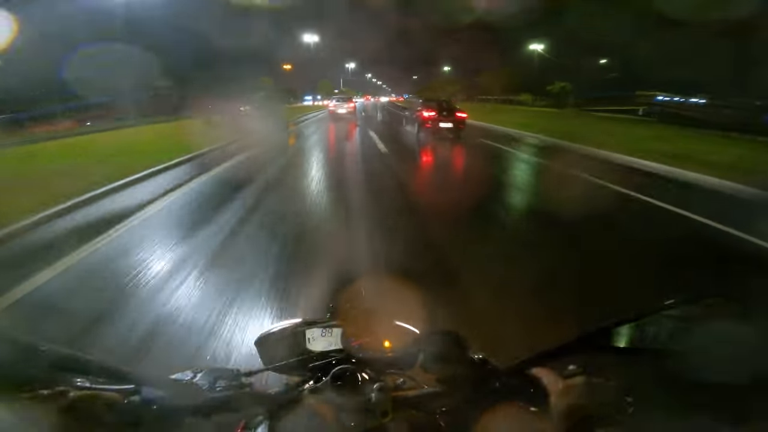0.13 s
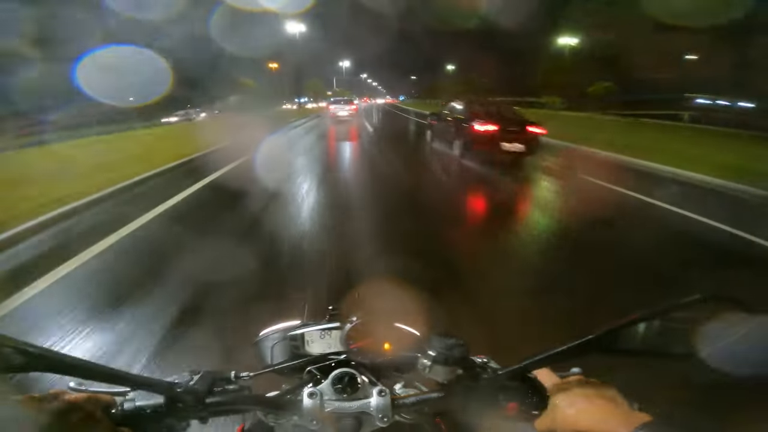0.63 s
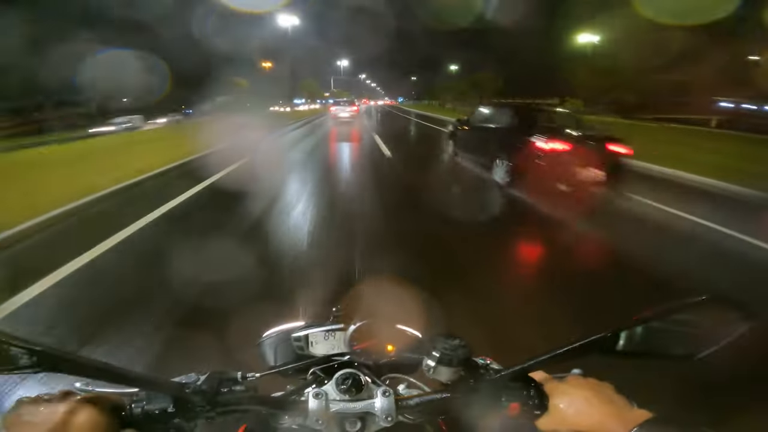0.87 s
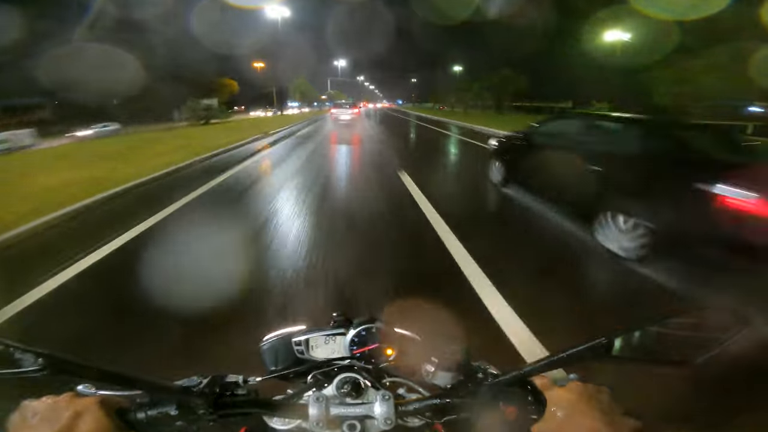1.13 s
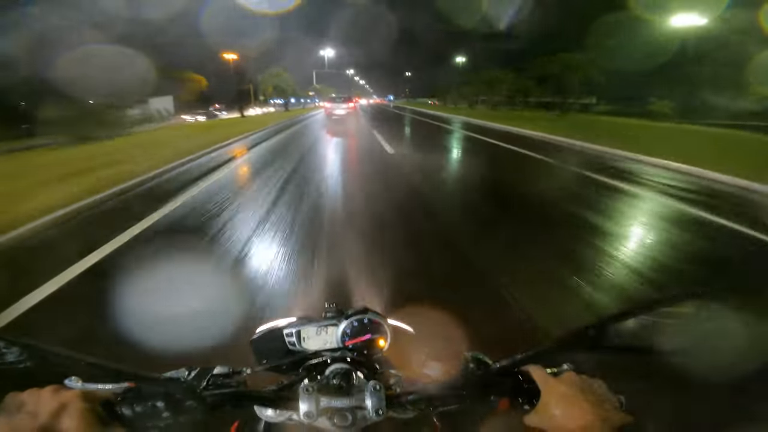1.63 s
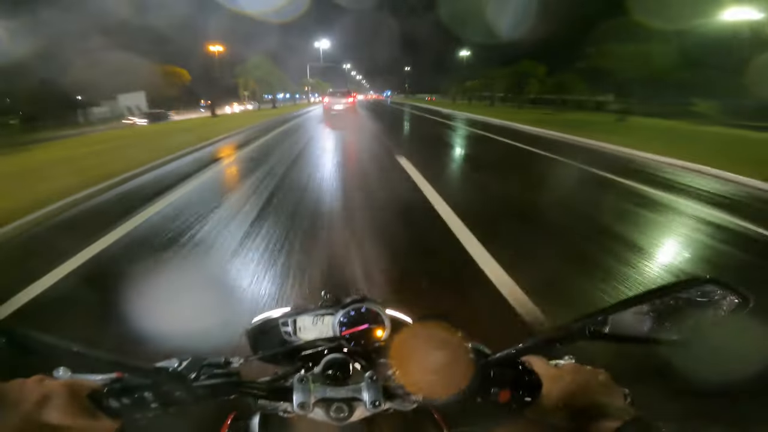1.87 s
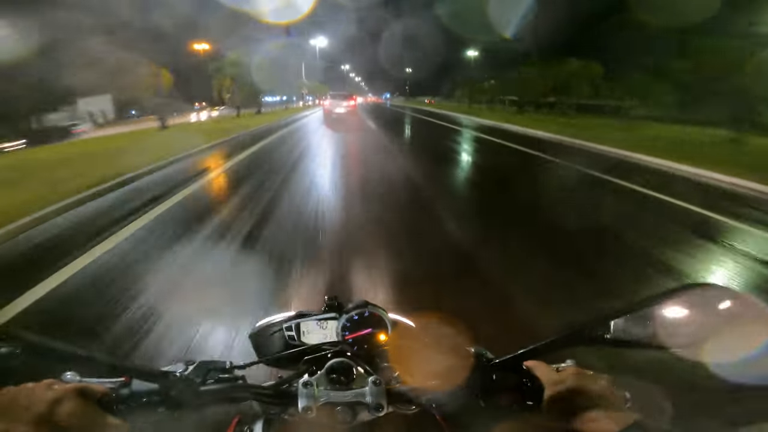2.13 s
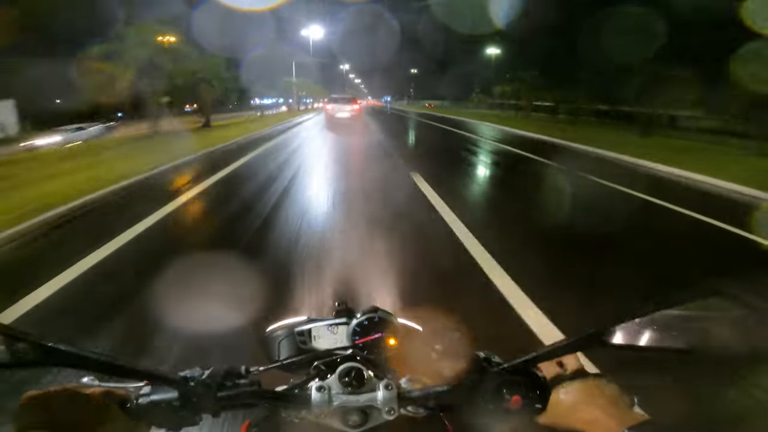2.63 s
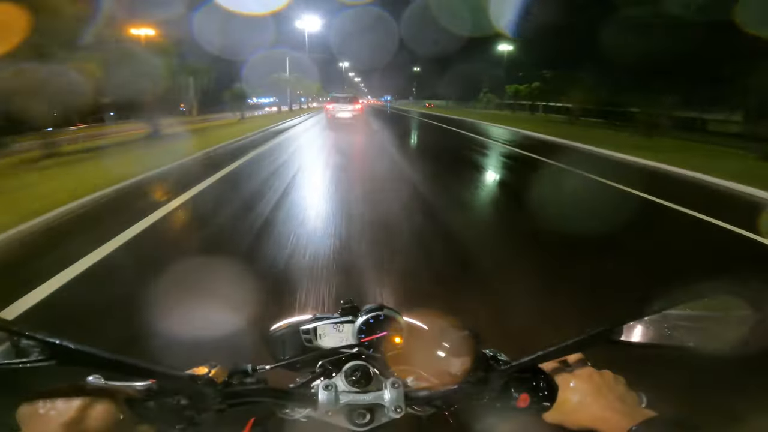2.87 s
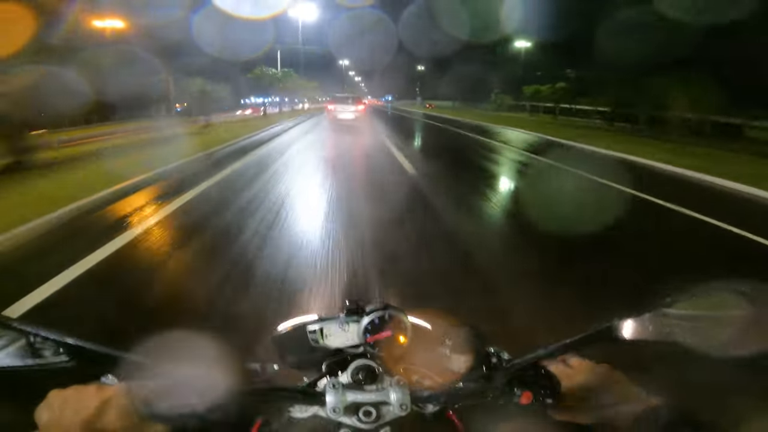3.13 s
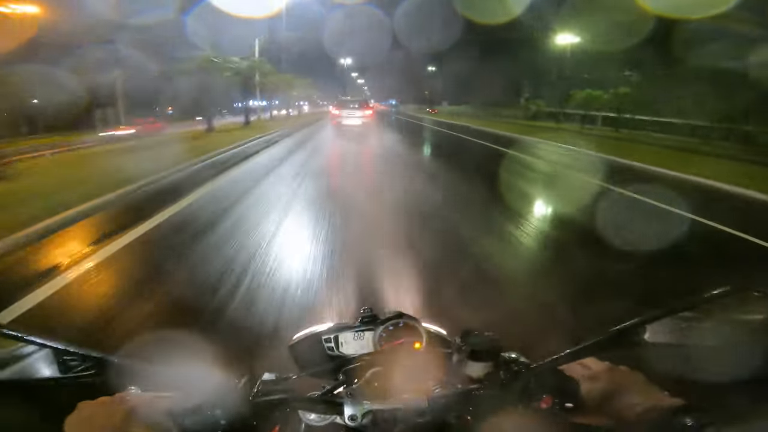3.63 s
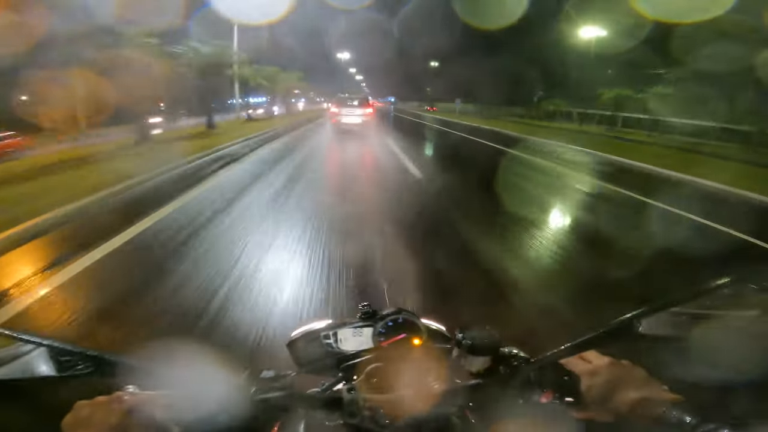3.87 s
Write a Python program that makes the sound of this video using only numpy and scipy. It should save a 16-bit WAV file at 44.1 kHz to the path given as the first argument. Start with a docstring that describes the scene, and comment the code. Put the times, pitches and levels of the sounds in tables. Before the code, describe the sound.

A motorcycle engine drones low and almost steady, rising very slightly in pitch and easing in strength from about 1.5 seconds. Wind buffets the close rider-mounted microphone in deep, irregular thumps over wet tyre roar and spray hiss. Raindrops tick, with heavier taps near 0.55 and 0.8 seconds and dull ones around 3.6. At about 3.2 the throttle closes, leaving a fading boom and uneven exhaust pops.

```python
"""A motorcycle exhaust drones on a wet road at night, heard by a microphone on the rider's helmet.
It is a sum of firing harmonics and a gear whine; near the end the throttle shuts, and a boom and resonant
pops join in. Close at the microphone, slow noise swings are the wind buffeting its port, and short decaying
ticks are raindrops on its housing. Below, throbbing noise and bursts of grains are the tyres and spray."""
import sys
import numpy as np
from scipy import signal
from scipy.fft import rfft, irfft
from scipy.io import wavfile
from scipy.ndimage import uniform_filter1d

SR = 44100
rng = np.random.default_rng(int(sys.argv[2]) if len(sys.argv) > 2 else 0)


def pcm_store(signal):
    """Save signal as 16-bit PCM."""
    levels = np.round(np.clip(np.atleast_2d(signal), -1, 1) * 32767)
    wavfile.write(sys.argv[1], SR, levels.astype(np.int16).T)


def decibels_to_gain(level_db):
    """Convert a level in decibels to a linear amplitude gain (20 dB per decade)."""
    exponent = np.asarray(level_db, float) / 20
    return 10 ** exponent


N = 176400  # samples, 4 s

# engine speed as firing rate: time_s, pitch_hz
FIRING_RATE = [(0, 119.0), (.6, 119.4), (1.3, 119.8), (1.9, 120.3), (2.3, 120.6), (3.11, 121.0),
               (3.18, 113.6), (3.25, 114.2), (3.31, 119.0), (3.6, 117.0), (4, 114.4)]
# exhaust pulse strength: time_s, level_db
PULSE_STRENGTH = [(0, 0.5), (.6, 1.5), (1.3, 0.5), (1.9, -2.5), (2.3, -5), (2.7, -5.5), (3.11, -2.5),
                  (3.19, -8.5), (3.26, -16), (3.55, -22), (3.7, -8), (4, -17.5)]
# exhaust harmonics 1 to 6, before the pulse strength acts: level_db (rms)
HARMONIC_LEVELS = [-32, -24.5, -34, -38, -33, -47.5]
# share of the pulse strength in dB that each harmonic follows: share (no unit)
HARMONIC_SHARES = [0.43, 0.82, 0.46, 0.45, 1.07, 0.74]
# unsteadiness of each harmonic: spread_db
HARMONIC_WAVERS = [2.87, 2.2, 1.6, 2.2, 1.1, 2]
# exhaust pipe resonances that colour the pops: pitch_hz, width_hz, relative level_db
PIPE_RESONANCES = [(161, 39, 1.5), (207.5, 50, 6.5), (257, 34, -12), (522, 60, 1), (560, 49, -4)]
# wind strength at the microphone, before BUFFET_GAIN_DB: time_s, level_db
GUSTS = [(0.0, -32), (0.04, -21), (0.56, -27.5), (0.63, -20), (0.78, -23), (0.83, -48), (0.87, -21.5),
         (1.05, -17), (1.31, -24), (1.64, -25), (2.1, -30.5), (2.28, -20), (2.31, -23.5), (2.48, -18.5),
         (2.56, -30), (3.03, -18), (3.05, -33), (3.12, -18), (3.2, -41), (3.27, -17), (3.49, -26.5),
         (3.59, -24), (3.61, -28.5), (4.0, -20.5)]
# spectrum of the buffeting: frequency_hz, relative level_db (per Hz)
BUFFET_SPECTRUM = [(3, -9.5), (6, 9), (18, -5.5), (30, -5), (50, -14), (76, -19), (110, -27.5), (200, -26),
                   (400, -45.5), (2000, -120)]
# strength of tyres, spray and air rush, before ROAR_GAIN_DB: time_s, level_db
ROAD_STRENGTH = [(0, -29.5), (.3, -31), (.7, -30.5), (1.1, -29.5), (1.5, -31.5), (1.8, -32), (2.1, -33.5),
                 (2.35, -33), (2.7, -33), (3.05, -32.5), (3.3, -32), (3.5, -34.5), (4, -34)]
# roar through the housing, resonant near 3.7 kHz: frequency_hz, relative level_db (per Hz)
ROAR_SPECTRUM = [(60, -2), (120, -2), (175, -3.5), (300, -3), (550, -3.5), (700, -7.5), (1000, -10.5),
                 (1400, -15), (1550, -19), (2100, -20), (2500, -23.5), (3000, -21.5), (3800, -21.5),
                 (4150, -25.5), (4450, -31), (6000, -35.5), (8700, -38.5), (9800, -42), (10700, -42),
                 (12500, -55.5), (14500, -70), (16000, -75)]
# loud raindrops, before delay, gain and tick colour: start_s, level_db, pitch_hz
BRIGHT_DROPS = [(0.0578, -32, 7070), (0.1024, -34, 6150), (0.1226, -26, 8760), (0.1994, -34, 8610),
                (0.2874, -32, 6660), (0.542, -18.5, 8690), (0.5694, -32, 6620), (0.7133, -28, 6000),
                (0.726, -21, 6040), (0.7652, -19, 6600), (0.816, -19, 8500), (0.8465, -30, 8930),
                (0.8534, -40, 8060), (0.8929, -23.5, 6020), (0.9268, -48, 6670), (0.942, -28, 6060),
                (1.121, -29, 6000), (1.1897, -23, 7070), (1.203, -24, 6370), (1.3942, -30, 7490),
                (1.5224, -35, 6180), (1.7888, -54, 6430), (2.1475, -45, 7920), (2.4603, -29, 7440),
                (2.5401, -24, 7100), (2.5764, -30, 7130), (2.6364, -29.5, 8100), (2.6734, -34, 6780),
                (2.7367, -43, 6380), (2.8274, -44, 6160), (2.8779, -38, 6320), (2.8938, -31, 6080),
                (2.9243, -38, 6280), (2.9377, -29.5, 8750), (3.022, -28.5, 6000), (3.05, -44, 6400),
                (3.0924, -32, 6560), (3.1764, -42, 7720), (3.2794, -32, 8150), (3.2934, -30, 6680),
                (3.6456, -58, 6020), (3.6696, -32, 6470), (3.7174, -29, 8620), (3.9389, -29, 7310),
                (3.9584, -33, 6360)]
# heavy dull drops, before their rise and decay: start_s, level_db, pitch_hz
DULL_DROPS = [(.5533, -7, 980), (0.5822, -7, 2280), (.7657, -39, 3800), (.818, -12, 2980),
              (2.577, -18, 3000), (3.022, -26, 2970), (3.601, -13, 3000), (3.671, -10, 3500)]
# colour of the bright ticks and patter: frequency_hz, gain_db
TICK_COLOUR = [(1000, -20), (3000, 5.5), (6000, -1), (9000, -1), (12000, -9.5), (14500, -20), (16000, -40)]

# rain
DROP_GAIN_DB, SPLASH_DB = -1, -3.5
DROP_RISE_S, DROP_DECAY_S, SPLASH_DECAY_S = 0.0004, 0.00062, 0.0032
THUD_CYCLES = 0.92  # a dull drop's decay to about a third, in cycles of its pitch
DRIZZLE_PER_S, DRIZZLE_DB, DRIZZLE_SPREAD_DB = 140, -51.5, 4.5  # before the rate drifts and the colour
# road
ROAR_GAIN_DB = 6
THROB_DEPTH = 0.08  # the roar throbs at the firing rate
SPRAY_GRAINS_PER_S, SPRAY_DB = 1600, -24  # level relative to the roar
# wind
BUFFET_GAIN_DB = 9
SLOW_SWING_DB, SLOW_GUST_SHARE = 4.5, 0.35  # slowest swings weigh more but follow the gusts in part
GUST_EVEN_S = 0.192  # flutter is evened over this time, so the gusts set its strength
PORT_LIMIT = 0.67  # pressure swings level off here (full scale = 1)
# engine
SHUT_S, SHUT_RAMP_S = 3.18, 0.054  # middle and length of the throttle's closing
PITCH_JITTER_HZ = 0.25
GEAR_RATIO, GEAR_DB = 9.31, -47.5  # times the firing rate; rms before the pulse strength acts
BOOM_DB, BOOM_WAVER_DB, BOOM_FADE_DB_PER_S = -24, 2.3, 2.5
BURBLE_DB, BURBLE_FADE_DB_PER_S = -26, 5
BURBLE_ROUGH, CYLINDER_DRIFT_HZ = 0.56, 6.3  # chance in each pop; pace of each cylinder's own change
PIPE_CUT_HZ = 490


def at_hz(points, hz):
    """Read a table along a logarithmic frequency axis."""
    table_hz, level_db = np.transpose(points)
    return np.interp(np.log(hz + 1e-3), np.log(table_hz), level_db)


def in_time(curve):
    """Interpolate a two-column time curve at every sample."""
    time_s, values = np.transpose(curve)
    return np.interp(np.arange(N) / SR, time_s, values)


def rms_one(x):
    """Scale to rms 1."""
    return x / np.sqrt(np.mean(x ** 2) + 1e-20)


def drift(rate):
    """Slow random wandering of spread 1, made by low-passing noise at every 40th sample."""
    pole = np.exp(-80 * np.pi * rate / SR)
    noise = rng.standard_normal(N // 40 + 2002)
    slow = signal.lfilter([1], [1, -2 * pole, pole * pole], noise)[2000:]  # settled part
    return np.interp(np.arange(N) / 40, np.arange(len(slow)), rms_one(slow))


def resonance(x, hz, width_hz):
    """Two-pole resonance with a gain of 1 at its peak."""
    r = np.exp(-np.pi * width_hz / SR)
    feedback = [1, -2 * r * np.cos(2 * np.pi * hz / SR), r * r]
    return signal.lfilter(np.array([1, 0, -1]) * (1 - r * r) / 2, feedback, x)


def patchy_noise(spectrum, shared_db, own_db, own_rate):
    """Coloured noise in overlapping octave bands that flicker together and alone; rms 1."""
    hz = np.arange(N // 2 + 1) * SR / N
    coloured = rfft(rng.standard_normal(N)) * decibels_to_gain(at_hz(spectrum, hz))
    octave = np.clip(np.log2(hz + 1e-3), 5, 14)
    together = drift(5.2)
    out = 0
    for centre in range(5, 15):  # 32 Hz to 16 kHz
        band = irfft(coloured * np.clip(1 - abs(octave - centre), 0, 1), N)
        out = out + band * decibels_to_gain(shared_db * together + own_db * drift(own_rate))
    return rms_one(out)


def road():
    """Tyres on wet asphalt and rushing air as flickering noise, spray as bursts of resonant grains."""
    throb = 1 + THROB_DEPTH * np.sin(2 * np.pi * np.cumsum(in_time(FIRING_RATE)) / SR)
    roar = throb * patchy_noise(ROAR_SPECTRUM, shared_db=0.56, own_db=0.5, own_rate=30.0)
    bursts = rng.random(N) < SPRAY_GRAINS_PER_S / SR
    grains = bursts * rng.standard_normal(N) * rng.exponential(1, N)
    spray = decibels_to_gain(SPRAY_DB) * rms_one(resonance(grains + 1e-18, 3210.0, 1450.0))
    return decibels_to_gain(in_time(ROAD_STRENGTH) + ROAR_GAIN_DB) * (roar + spray)


def drop(db, hz, grit, broad, decay_s=DROP_DECAY_S):
    """One drop: a sharp tick ringing at its pitch, with a short splash of noise."""
    t = np.arange(len(grit)) / SR
    envelope = (1 - np.exp(-t / DROP_RISE_S)) * np.exp(-t / decay_s)
    tick = envelope * (np.sin(2 * np.pi * hz * t) + broad * grit)
    splash = broad * decibels_to_gain(SPLASH_DB) * np.exp(-t / SPLASH_DECAY_S) * grit
    return decibels_to_gain(db) * (tick + splash)


def drizzle():
    """Fine patter: random hits, thicker and thinner by turns, each a decaying burst of noise."""
    chance = DRIZZLE_PER_S * decibels_to_gain(4.0 * drift(3.0)) / SR
    strength = decibels_to_gain(DRIZZLE_SPREAD_DB * np.minimum(rng.exponential(1, N), 2))
    hits = (rng.random(N) < chance) * strength
    fade = np.exp(-1 / (DROP_DECAY_S * SR))
    envelope = signal.lfilter([1], [1, -fade], hits + 1e-18)
    return decibels_to_gain(DRIZZLE_DB) * envelope * rng.standard_normal(N)


def rain():
    """Drops striking the housing: coloured bright ticks and patter, and plain dull thuds."""
    size = 800  # samples per drop
    bright, dull = np.zeros((2, N + size))
    grits = rng.standard_normal((len(BRIGHT_DROPS), size))
    for (start_s, db, hz), grit in zip(BRIGHT_DROPS, grits):
        first = int(start_s * SR) + 40
        bright[first:first + size] += drop(db + DROP_GAIN_DB, hz, grit, broad=0.65)
    for start_s, db, hz in DULL_DROPS:
        first = int(start_s * SR)
        dull[first:first + size] += drop(db, hz, np.zeros(size), broad=0, decay_s=THUD_CYCLES / hz)
    hz = np.linspace(0, SR / 2, 129)
    # the minimum-phase step halves the gain in dB, so it is doubled here
    doubled = signal.firwin2(255, hz, decibels_to_gain(2 * at_hz(TICK_COLOUR, hz)), fs=SR)
    colour = signal.minimum_phase(doubled)
    return signal.lfilter(colour, 1, bright[:N] + drizzle()) + dull[:N]


def wind():
    """Lumpy low pressure swings that follow the gusts and level off at the microphone port."""
    gust_db = in_time(GUSTS)
    lumps = patchy_noise(BUFFET_SPECTRUM, shared_db=2.0, own_db=1.0, own_rate=3.0)
    slow = signal.sosfiltfilt(signal.butter(2, 20.0, fs=SR, output="sos"), lumps)
    flutter = lumps - slow
    local_rms = np.sqrt(uniform_filter1d(flutter ** 2, int(GUST_EVEN_S * SR)) + 1e-9)
    flutter = flutter * flutter.std() / local_rms
    swing_db = gust_db - gust_db.mean()
    push = decibels_to_gain(swing_db) * flutter + decibels_to_gain(SLOW_SWING_DB + SLOW_GUST_SHARE * swing_db) * slow
    push = decibels_to_gain(BUFFET_GAIN_DB + gust_db.mean()) * push
    return PORT_LIMIT * np.tanh(push / PORT_LIMIT)


def firing_tone(firings, k, db, waver_db):
    """Sine at k times the firing rate, at an unsteady rms level."""
    level = np.sqrt(2) * decibels_to_gain(db + waver_db * drift(21.2))
    return level * np.sin(2 * np.pi * k * firings + k * k)


def burble(firings):
    """Weak, uneven firings of four cylinders in turn, each exciting the pipe's resonances; rms 1."""
    cylinders = np.array([drift(CYLINDER_DRIFT_HZ) for _ in range(4)])
    contrast = cylinders - cylinders.mean(axis=0)
    uneven = contrast[firings.astype(int) % 4, np.arange(N)]
    firing_now = np.diff(np.floor(firings), prepend=0)
    fired = firing_now * (uneven + BURBLE_ROUGH * rng.standard_normal(N))
    pops = sum(decibels_to_gain(db) * resonance(fired + 1e-18, hz, width) for hz, width, db in PIPE_RESONANCES)
    low_pass = signal.butter(2, PIPE_CUT_HZ, fs=SR, output="sos")
    return rms_one(signal.sosfilt(low_pass, pops))


def engine():
    """Firing harmonics and gear whine, joined by a boom and burble once the throttle shuts."""
    pulse_db = in_time(PULSE_STRENGTH)
    firings = np.cumsum(in_time(FIRING_RATE) + PITCH_JITTER_HZ * drift(8.0)) / SR  # count so far
    since_shut = np.arange(N) / SR - SHUT_S
    shut = np.clip(since_shut / SHUT_RAMP_S + 0.5, 0, 1)
    drone = 0
    harmonics = zip(HARMONIC_LEVELS, HARMONIC_SHARES, HARMONIC_WAVERS)
    for k, (db, share, waver_db) in enumerate(harmonics, start=1):
        drone = drone + firing_tone(firings, k, db + share * pulse_db, waver_db)
    whine = firing_tone(firings, GEAR_RATIO, GEAR_DB + pulse_db, 1.8)
    boom = firing_tone(firings, 1, BOOM_DB - BOOM_FADE_DB_PER_S * since_shut, BOOM_WAVER_DB)
    pops = decibels_to_gain(BURBLE_DB - BURBLE_FADE_DB_PER_S * since_shut) * burble(firings)
    return drone + whine + shut * (boom + pops)


def scene():
    """Road, rain, wind and engine reach the one helmet microphone."""
    return (road() + rain() + wind() + engine())[None]


def band_limit(x):
    """A steep low-pass at the top of the band."""
    return signal.sosfilt(signal.butter(12, 15800, fs=SR, output="sos"), x)


def record(dry):
    """Deliver the microphone's finished mix."""
    return band_limit(dry)


dry = scene()
out = record(dry)
pcm_store(out)
```